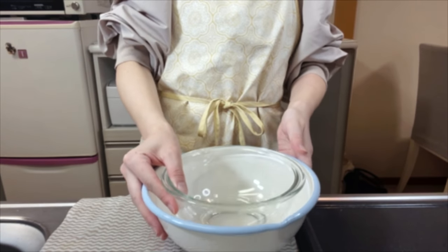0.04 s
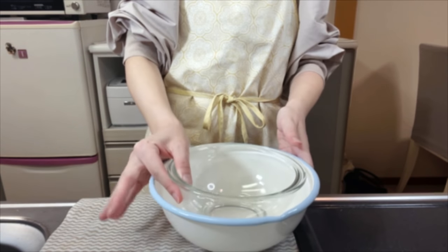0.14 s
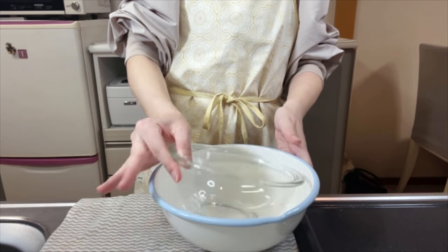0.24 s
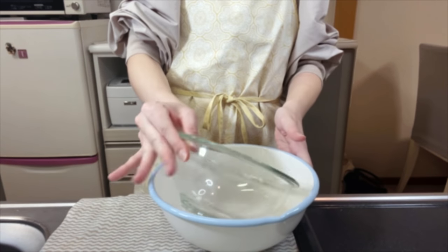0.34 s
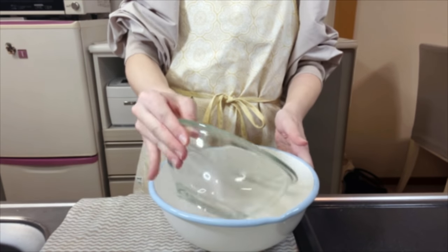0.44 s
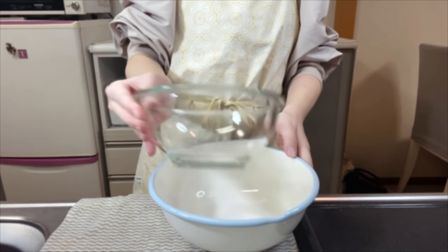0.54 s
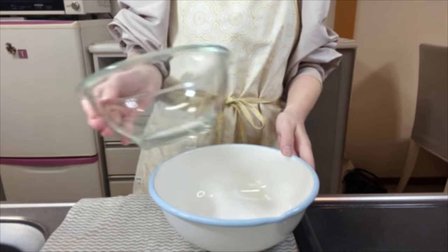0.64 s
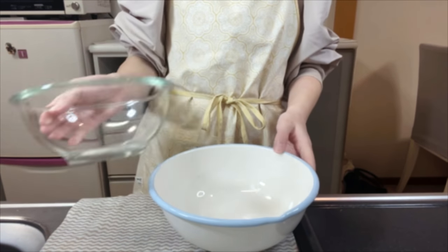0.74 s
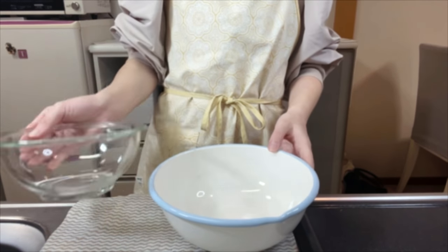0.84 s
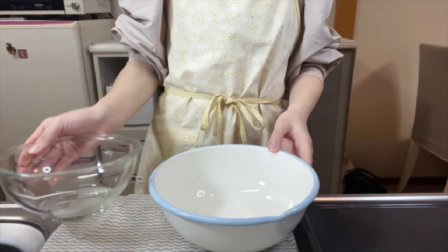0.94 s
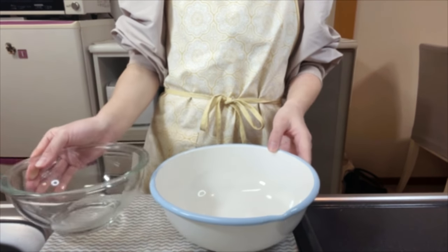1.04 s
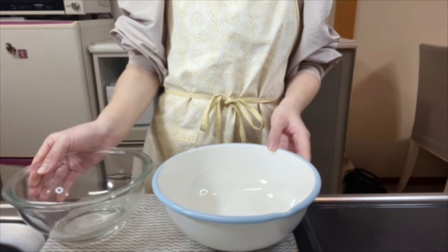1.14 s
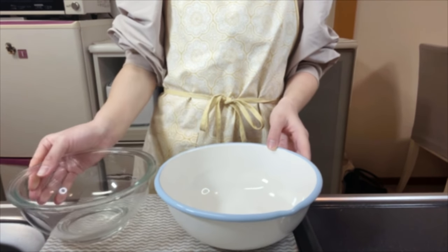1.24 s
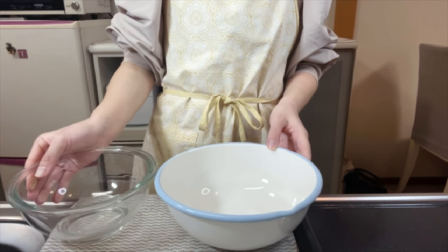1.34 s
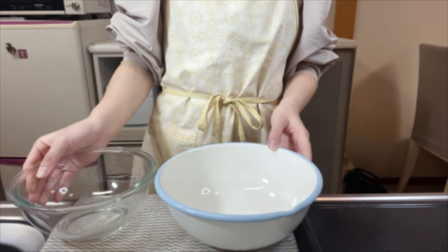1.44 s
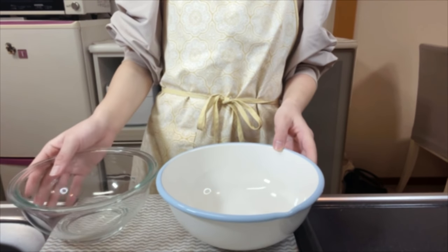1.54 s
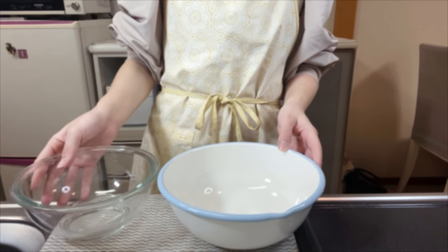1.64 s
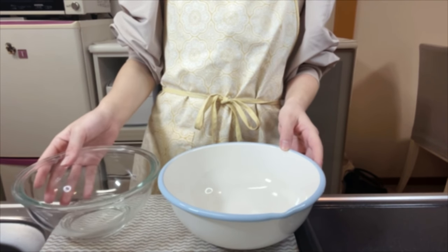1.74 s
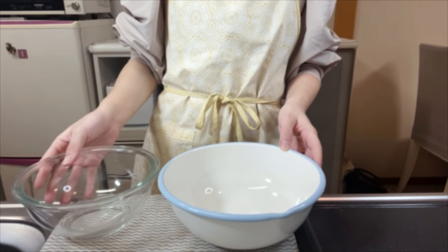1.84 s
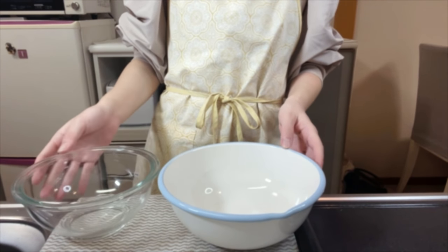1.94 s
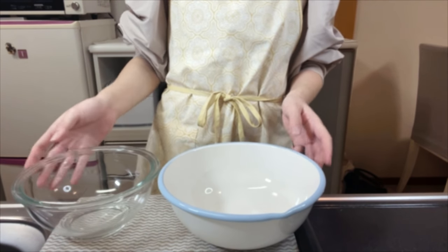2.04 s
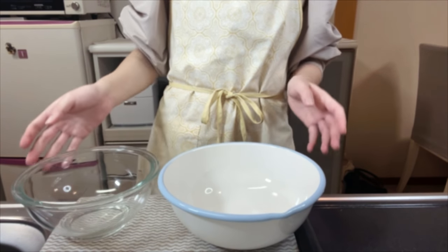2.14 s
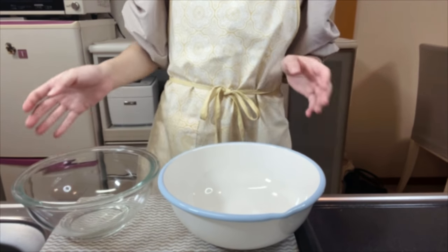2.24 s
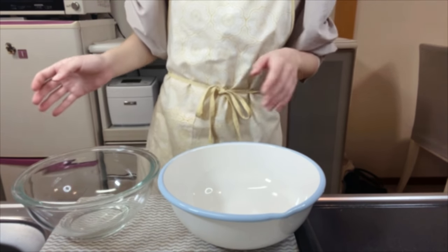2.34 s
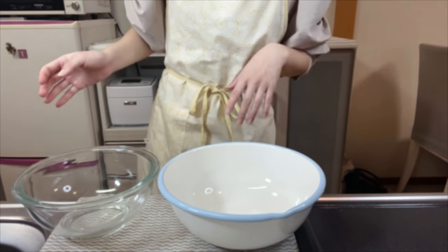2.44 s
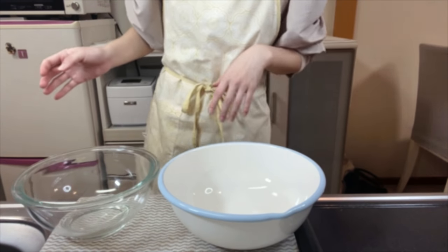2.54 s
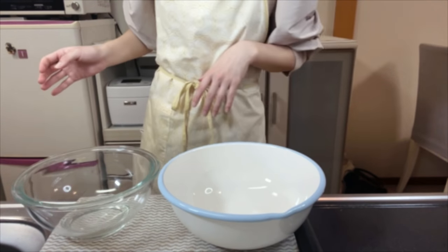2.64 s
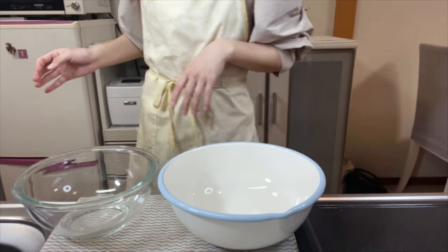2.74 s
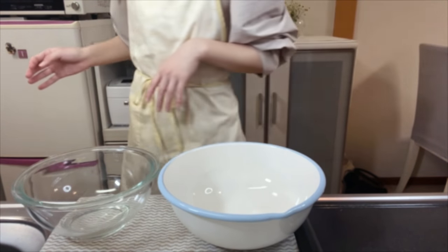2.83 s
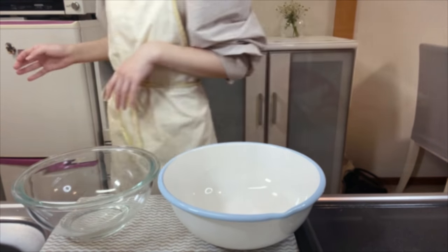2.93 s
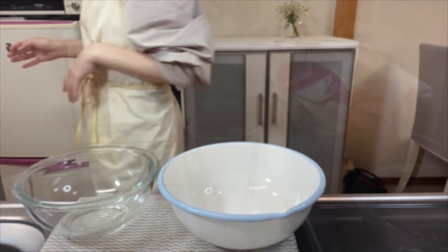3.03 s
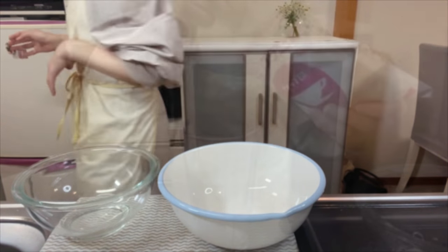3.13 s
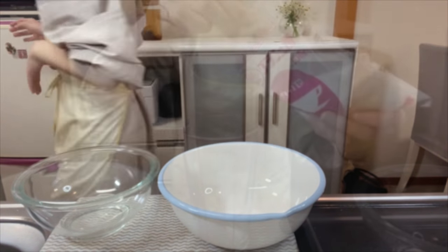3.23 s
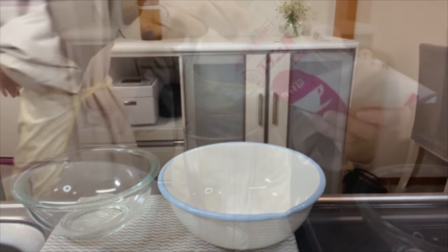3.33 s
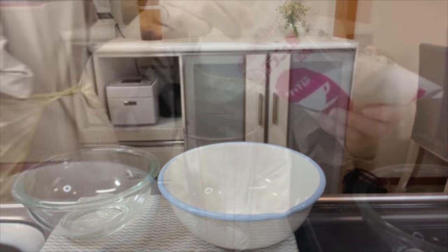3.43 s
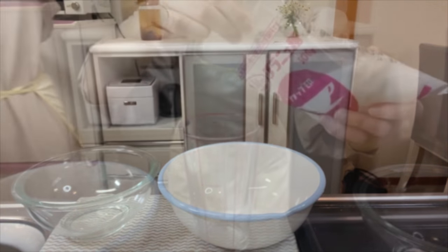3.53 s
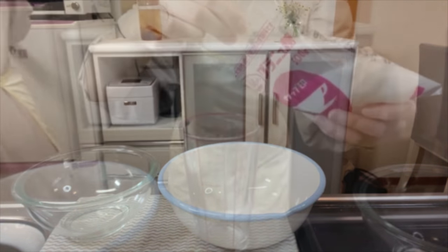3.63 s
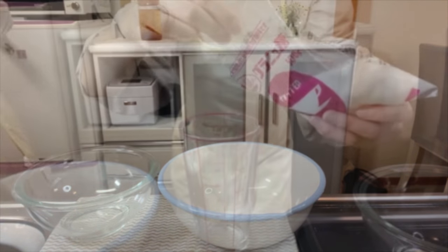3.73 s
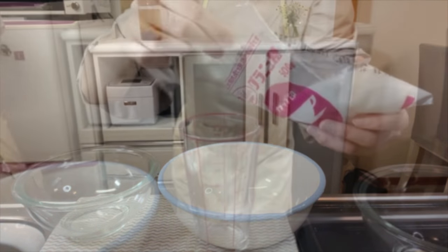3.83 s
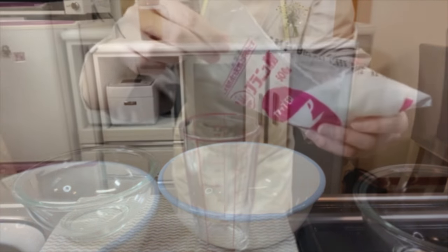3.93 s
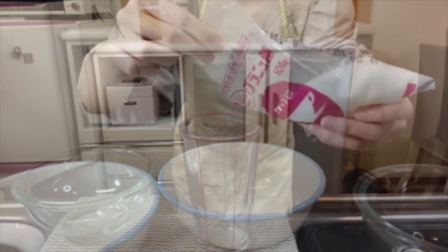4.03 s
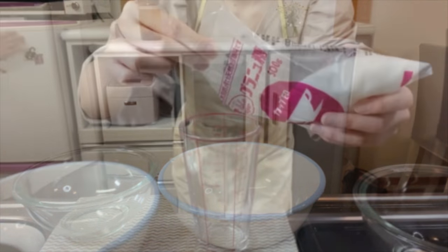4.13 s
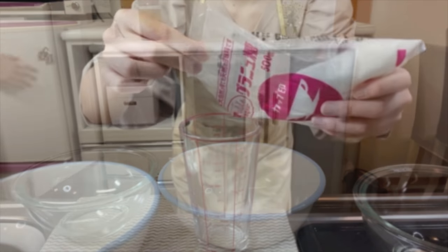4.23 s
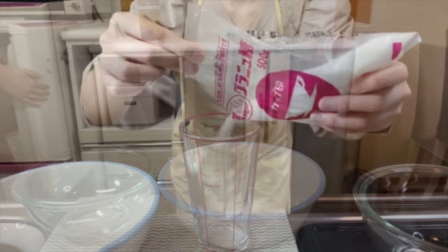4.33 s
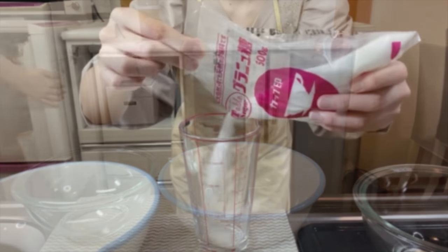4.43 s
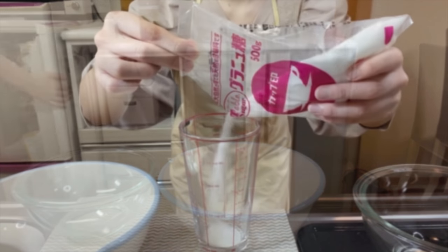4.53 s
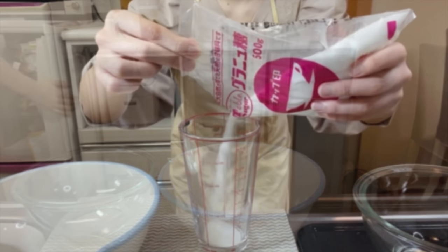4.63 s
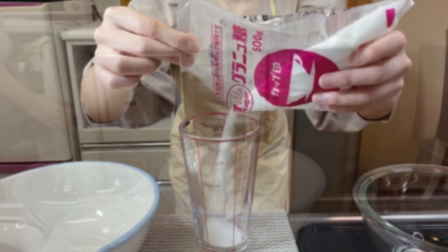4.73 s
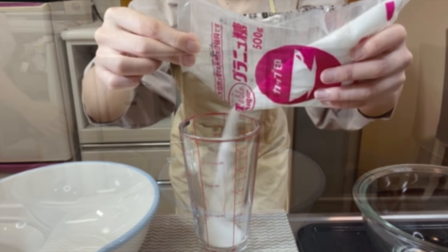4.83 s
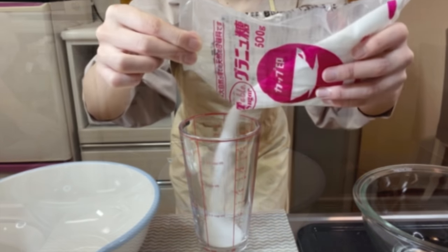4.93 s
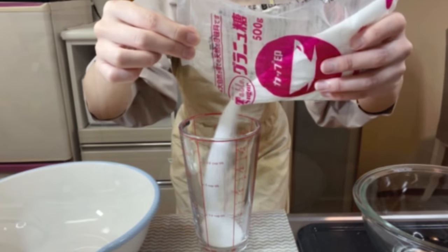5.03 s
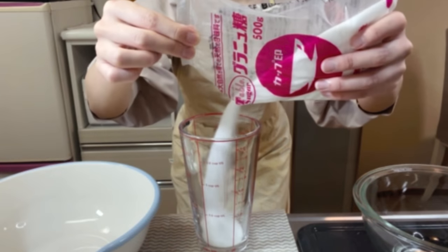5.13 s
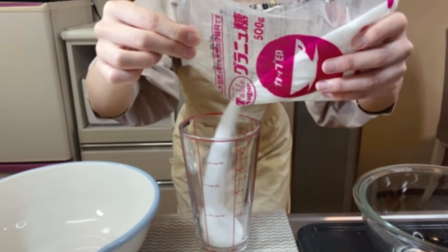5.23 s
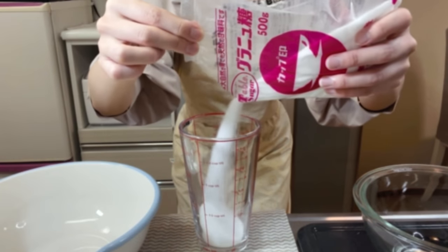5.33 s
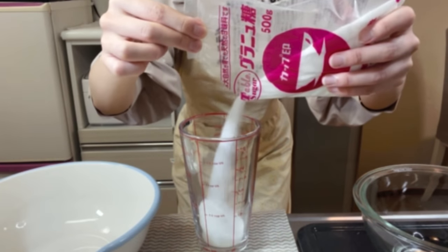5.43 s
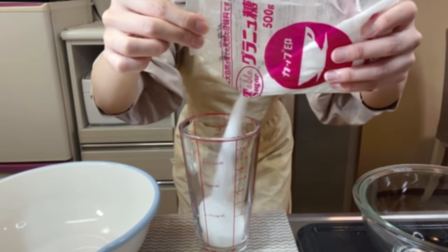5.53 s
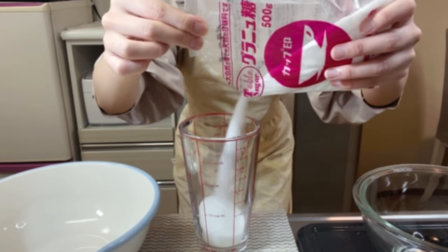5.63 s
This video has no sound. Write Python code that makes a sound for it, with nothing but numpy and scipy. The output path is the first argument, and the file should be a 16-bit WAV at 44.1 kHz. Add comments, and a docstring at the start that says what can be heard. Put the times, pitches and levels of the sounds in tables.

```python
"""In a quiet kitchen, a glass bowl scrapes out of an enamel bowl and is set down against a dish. Rubbing makes
the bowls hiss and squeal; knocks make the glass bowl ring in three clinks, its notes short and raised where it
presses on the dish. Someone steps away, clothes rustling. The room's hum swells as the scene fades over to
sugar pouring from a crackling bag, its crystals ticking on a tall glass. A microphone listens close by, left
and right."""
import sys
import numpy as np
from scipy import signal
from scipy.fft import rfft, irfft, next_fast_len
from scipy.io import wavfile
from scipy.ndimage import uniform_filter1d

SR = 44100
rng = np.random.default_rng(int(sys.argv[2]) if len(sys.argv) > 2 else 0)


def unload_audio(sound):
    """Save the sound as a 16-bit wav file, at the path given as the first command line argument."""
    columns = np.transpose(np.atleast_2d(sound))
    # keep every value between -1 and 1, then stretch to whole-number steps
    steps = np.round(np.clip(columns, -1, 1) * 32767)
    wavfile.write(sys.argv[1], SR, steps.astype(np.int16))


N = 250047
LIFT_S, SET_DOWN_S = .32, 1.1  # the glass bowl is in the air between these times

# The notes things ring with. Each row: pitch in Hz, level in dB, ring time in seconds
# (the time to fade by 60 dB, or t60), phase of right against left in radians.
GLASS_NOTES = [(409, -14, 1.1, 0), (1139, -24, 2, -2), (2144, 0, 1, 2.7), (2964, -10, .5, 1.6),
               (3007, -9, .55, 0), (3683, -3, .55, 2.6), (4242, 0, .36, -1.7), (4278, -2, .27, .8),
               (4805, -8, .3, -.8), (4857, -10, .3, .7), (5380, -14, .3, -2.5), (5456, -4, .31, 1.1),
               (6066, -6, .22, 1.6), (6270, -21, .5, -1.5), (6297, -16, .5, -2.4), (6655, -10, .22, -1.4),
               (7220, -12, .16, .3)]
RIM_NOTE = [(2079, 0, 1, 0)]  # the bowl's clearest note, strong or weak by the spot that is struck
PRESSED_NOTES = [(863, -15, .12, -.5), (1167, -7, .12, -.6), (2178, -2, .16, .9), (3025, -6, .11, .4),
                 (3055, -7, .15, .8), (3095, -11, .1, 0), (4307, -11, .1, 0), (3720, -4, .17, 2.4),
                 (4880, -10, .16, 0), (5449, -14, .15, 2), (6686, -14, .16, -1), (7262, -18, .13, -.5),
                 (7600, -22, .14, 0), (8258, -18, .12, -1.6), (8432, -20, .11, -2), (8790, -20, .1, -2),
                 (9200, -23, .1, 0), (10450, -23, .1, 0)]
TOUCH_NOTES = [(704.4, -1.5, 0.094, 3.5), (1222, -14.5, .08, 2), (1353.5, -5.5, 0.12, -1),
               (1379, 3.5, 0.043, -1.8), (1506, -3, 0.072, -9), (1635, -5.5, 0.079, 0.5),
               (1873, -14.5, 0.24, 2.5), (2278, 0, 0.049, 2.5), (2620, -19.5, 0.035, 4),
               (3380, -13, 0.1, -4.5)]  # both bowls, muffled where they touch
ENAMEL_NOTES = [(1194.6, -58, 4.5, -.2), (1196.2, -66, 4.5, -.2), (1117, -68, 1.5, -2)]  # two lie so close that they slowly waver
# The tone of the clatter. Each row: frequency in Hz, level in dB.
CLATTER_TONE = [(120, -42.5), (200, -1), (1000, -21.5), (1160, 0), (1940, -0.5), (2130, -36.5), (2650, -4),
                (3020, -13.5), (12600, -12.5), (16000, -45)]
# The knocks. Each row: start in seconds, five levels in dB (glass, rim, pressed, touch, clatter), # rattle time
# in seconds, brightness of the pressed notes in dB per octave.
KNOCKS = [(0.053, -65, -84, -63, -41, -54.5, 0.0043, 1), (0.093, -69, -71, -63, -42.5, -57, 0.0055, -11),
          (.12, -58.5, -63.5, -48, -65, -64, .007, -1), (.266, -57, -47, -72, -34, -60, 0.0068, 2),
          (0.282, -51, -59.5, -68, -26, -63, 0.0012, 0), (.314, -65, -63, -77, -24, -64, 0.0026, 0),
          (.324, -42.5, -32.5, -63, -44, -25, 0.0058, 0), (1.251, -36, -39.5, -29.5, -46, -22, 0.02, 0),
          (1.257, -28, -24, -22, -24, -17.5, 0.016, -7), (1.418, -43, -38, -26, -32, -17, 0.0064, 2),
          (1.436, -39, -47.5, -33.5, -23.5, -30, 0.021, 0.5),
          (1.677, -37.5, -41.5, -39, -26.5, -25, 0.013, 3), (1.684, -25, -40, -21.5, -32, -25.5, 0.024, 1)]
def bowl_knocks():
    """Each knock is one hit and a dying rattle of smaller ones; returns ringing and clatter."""
    ringing, clatter = np.zeros((2, 2, N))
    held, free = [(ring(GLASS_NOTES, .9, grip, tilt_db=-3.5), ring(RIM_NOTE, .9, grip))
                  for grip in (2.8, 0)]
    touch, t = ring(TOUCH_NOTES, .4), np.arange(4000) / SR
    for start, glass_db, rim_db, pressed_db, touch_db, clatter_db, rattle_s, bright_db in KNOCKS:
        dying = np.exp(-t / rattle_s)
        rattle = dying * rng.standard_normal(len(t)) * (rng.random(len(t)) < .04)
        hits = (t == 0) + .99 * rattle / np.linalg.norm(rattle)
        glass, rim = free if LIFT_S < start < SET_DOWN_S else held
        pressed = ring(PRESSED_NOTES, .4, tilt_db=bright_db)
        notes = gain_of(glass_db) * glass + gain_of(rim_db) * rim
        add(notes, 0, gain_of(pressed_db) * pressed + gain_of(touch_db) * touch)
        struck = signal.fftconvolve(notes, hits[None], axes=1)
        swell = rise(np.arange(struck.shape[1]) / SR, .0026)
        add(ringing, start, swell * struck)
        noise = coloured(stereo_noise(len(t), shared=.27), CLATTER_TONE)
        add(clatter, start, gain_of(clatter_db) * swell[:len(t)] * dying * noise)
    add(ringing, 1.69, gain_of(-1) * ring(ENAMEL_NOTES, 2))  # enamel sings on after the last clink
    return ringing, clatter


# The strength of the sugar stream. Each row: time in seconds, level in dB.
SUGAR_FLOW = [(3.75, -71.5), (4.022, -57), (4.208, -30), (4.33, -31.5), (4.476, -45), (4.664, -43),
              (4.926, -34.5), (5.226, -35.5), (5.562, -41.5), (5.67, -40.5)]
# The tone of the ticking crystals. Each row: frequency in Hz, level in dB.
SUGAR_TONE = [(180, -56), (300, -5), (405, -11.5), (915, -14), (3030, -8.5), (3400, -5.5), (3890, -13),
              (4230, -8.5), (6960, -7), (9880, -10.5), (12100, -7.5), (15200, -15), (16000, -33)]
# The tall glass's notes. Each row: pitch in Hz, width in Hz (wider dies sooner), level in dB.
TALL_GLASS_NOTES = [(3227, 260, -20), (4563, 530, 9), (6540, 160, -27), (6894, 200, 3)]
def sugar_pour():
    """Thousands of crystals tick on the glass and make its wall ring."""
    ticks = grains(per_s=14000, spread_db=2.8, shared=.35)
    ticks[0] = np.roll(ticks[0], 6)  # the glass stands nearer the right, so the left hears it later
    wall = ring([(hz, db, 4.3 / width, 0) for hz, width, db in TALL_GLASS_NOTES], .05)
    ringing = evened(signal.fftconvolve(ticks, wall, axes=1)[:, :N])
    ringing *= gain_of(np.where(clock() <= 4.04, -4.5, -18.5))  # drops as sugar covers the glass
    flutter = gain_of(1.3 * evened(uniform_filter1d(rng.standard_normal(N), 1500)))  # an uneven stream
    # each snap of the bag shakes extra sugar out
    jolts = 1 + sum(gain_of(-1.5) * pulse(start, rise_s=.001, t60=.0896) for start, _ in BAG_SNAPS)
    return follow(SUGAR_FLOW) * jolts * flutter * (coloured(ticks, SUGAR_TONE) + ringing)


# The bag's snaps. Each row: start in seconds, level in dB.
BAG_SNAPS = [(4.259, -11), (4.353, -10)]
# The notes of a snap. Each row: pitch in Hz, level in dB, ring time in seconds, phase in radians.
SNAP_NOTES = [(700, -57, 0.025, .3), (1496, 9.5, 0.0031, 1), (2840, 5, 0.0043, 2.12),
              (4440, -8, 0.011, 2.1), (6500, -21, .005, 4.5)]
def bag_snaps():
    """A crease of the bag lets go all at once."""
    out, crack = np.zeros((2, N)), ring(SNAP_NOTES, .05)
    crack *= rise(np.arange(crack.shape[1]) / SR, .00028)
    for start, db in BAG_SNAPS:
        add(out, start, gain_of(db) * crack)
    return out


# Glass dragging on enamel. Each row: time in seconds, level of the hiss in dB.
SCRAPE_LEVELS = [(.11, -72), (.122, -45), (.15, -56.5), (.19, -47), (.27, -41), (.345, -35.5), (.38, -58),
                 (.43, -63)]
# The tone of that hiss. Each row: frequency in Hz, level in dB.
SCRAPE_TONE = [(400, 7.5), (900, -5.5), (3300, -1), (4500, -13.5), (7000, -8.5), (10000, -17),
               (12500, -14.5), (16000, -25)]
def bowl_scrape():
    """Tiny slips hiss and set the touching bowls ringing; the rim catches and squeals until the lift."""
    slips, hiss = grains(per_s=5000, spread_db=.66, shared=.4), follow(SCRAPE_LEVELS)
    touching = clock() < LIFT_S
    bite = gain_of(-45) * (hiss / gain_of(-43)) ** 1.8 * touching  # a harder drag rings much more
    notes = ring(TOUCH_NOTES, .2) + gain_of(-19) * ring(PRESSED_NOTES, .2, tilt_db=1.7)
    bowls = resonate(bite * evened(slips), notes)
    catch = gain_of(-34.5) * np.clip((clock() - .22) / .027, 0, 1) * touching
    squeal_note = ring([(1404, 0, .097, .66)], .2)
    squeal = resonate(catch * evened(slips.sum(0))[None], squeal_note)
    return hiss * coloured(slips, SCRAPE_TONE) + bowls + squeal


# Soft bumps of counter, bowls and floor. Each row: start in seconds, level in dB, pitch in Hz.
THUMPS = [(.189, -31.5, 344), (.192, -27, 737), (0.336, -31.5, 151), (1.143, -15.5, 88.9),
          (1.145, -30.5, 197.4), (1.265, -25, 157), (1.419, -22, 89.7), (1.577, -37.5, 83),
          (1.681, -30.5, 94.5), (2.35, -40.5, 116), (2.938, -42, 97.6), (3.348, -31.5, 100.6),
          (3.362, -28.5, 65), (3.41, -41.5, 492), (3.452, -36, 201), (3.531, -34.5, 202),
          (3.691, -38.5, 183), (3.505, -35.5, 90.7), (3.512, -30.5, 269), (3.667, -34.5, 291),
          (3.673, -34, 83), (3.749, -39, 314), (3.839, -31.5, 95.8), (3.873, -47, 960), (4.022, -38.5, 803),
          (4.024, -41, 700), (4.046, -32, 95), (5.089, -29, 111), (5.515, -28, 107)]
def thumps():
    """A bumped thing swings briefly and chatters with small contacts; higher pitches die sooner."""
    out, t = np.zeros(N), np.arange(SR // 2) / SR
    for start, db, hz in THUMPS:
        t60 = .19 / (hz / 100) ** .15
        swing = gain_of(db - 60 * t / t60) * rise(t, .0058) * np.sin(2 * np.pi * hz * t)
        chatter = rng.standard_normal(len(t)) * np.exp(-t / .019)
        bump = swing + .8 * signal.fftconvolve(swing, chatter / np.linalg.norm(chatter))[:len(t)]
        add(out, start, bump * np.linalg.norm(swing) / np.linalg.norm(bump))
    return out


# Dull scuffs of steps or a door. Each row: start in seconds, level in dB, fade time in seconds,
# treble in dB.
SCUFFS = [(2.353, -52, .22, -19), (2.791, -59, .093, -24), (2.884, -55.5, 0.142, -25.5),
          (2.933, -57, 0.6, -17), (3.345, -48.5, 0.21, -17.5), (3.403, -51.5, .22, 0),
          (3.504, -40, 0.19, -25), (3.661, -40, .23, -41), (3.742, -45.5, 0.063, -34),
          (3.873, -48, 0.094, -44)]
def scuffs():
    """Each scuff is a tick at the first touch, then a soft puff of noise."""
    out, t = np.zeros((2, N)), np.arange(SR // 2) / SR
    for start, db, t60, treble_db in SCUFFS:
        treble = [(8000, treble_db), (12500, treble_db - 4.5), (16000, treble_db - 8)]
        puff = coloured(stereo_noise(len(t), shared=.68), [(60, -20), (250, 0), (1140, -6)] + treble)
        tick = gain_of(-3) * np.exp(-t / .0027)
        add(out, start, gain_of(db - 60 * t / t60) * (rise(t, .0063) + tick) * puff)
    return out


# Sleeves, apron and bag moving. Each row: start in seconds, length in seconds, top level in dB.
MOVEMENTS = [(0.417, 0.47, -64), (1.035, 0.26, -76), (1.98, 0.47, -62.5), (2.324, 0.12, -63),
             (2.525, .19, -71.5), (2.767, 0.49, -69), (3.1, 0.42, -67), (3.325, 0.25, -63.5),
             (3.489, 0.089, -51), (3.637, 0.093, -54), (3.79, 0.19, -80)]
# The tone of the rustle. Each row: frequency in Hz, level in dB.
RUSTLE_TONE = [(180, -70), (300, 3), (528, -14), (774, -23), (1320, -4.5), (3190, -7), (9880, -25.5),
               (12700, -23.5), (16000, -36)]
def cloth_rustle():
    """Cloth crackles softly, one swell for each movement."""
    level = np.zeros(N)
    for start, length, db in MOVEMENTS:
        progress = np.arange(0, length, 1 / SR) / length
        swell = abs(np.sin(np.pi * progress ** .84)) ** 1.8  # a narrow hump that peaks early
        add(level, start, gain_of(db) * swell)
    return level * coloured(grains(per_s=9000, spread_db=1.8, shared=.1), RUSTLE_TONE)


# The tone of the kitchen's hum. Each row: frequency in Hz, level in dB.
HUM_TONE = [(15, -33), (30, -38.5), (55, -12.5), (90, -0.5), (112, -3), (140, -11.5), (170, -10),
            (220, -15.5), (400, -13), (600, -19.5), (1000, -26), (1500, -33), (6000, -45.5), (12200, -51),
            (16000, -61)]
# How alike it is left and right. Each row: frequency in Hz, likeness from 0 to 1.
HUM_LIKENESS = [(30, .92), (110, 0.66), (300, 0.74), (700, .2), (2000, .1)]
def room_hum():
    """Low noise drifts in patches, grows for the pouring scene and jumps as knocks shake the counter."""
    frames, hz = N // 256 + 5, np.fft.rfftfreq(1024, 1 / SR)
    left_re, left_im, own_re, own_im, patches = rng.standard_normal((frames, 513, 5)).T
    patches = evened(uniform_filter1d(uniform_filter1d(patches, 6, 0), 10, 1))
    alike, left = read(HUM_LIKENESS, hz)[:, None], left_re + 1j * left_im
    right = alike * left + np.sqrt(1 - alike ** 2) * (own_re + 1j * own_im)
    spectra = np.array([left, right]) * gain_of(read(HUM_TONE, hz)[:, None] + 2 * patches)
    level = np.interp(clock(), [3.26, 4.48], gain_of([-57.5, -42.5]))
    for start, *_, clatter_db, _, _ in KNOCKS:
        level += gain_of(clatter_db - 19.5) * pulse(start, rise_s=.02, t60=.44)
    return level * evened(signal.istft(spectra, nperseg=1024, noverlap=768)[1][:, :N])


# How long the kitchen echoes. Each row: frequency in Hz, fade time in seconds.
ECHO_TIMES = [(100, .3), (1000, .2), (4000, .16), (12000, .13)]
def kitchen_echo(sound):
    """Many small reflections arrive at random; the high frequencies die first."""
    taps, slots = np.zeros((2, SR // 2)), np.arange(150, SR // 2 - 20, 20)
    arrivals = slots + rng.integers(0, 20, (2, len(slots)))
    np.put_along_axis(taps, arrivals, rng.choice([-1., 1.], arrivals.shape), 1)
    hz, t, spectra = signal.stft(taps, SR, nperseg=256)
    spectra *= gain_of(-60 * t / read(ECHO_TIMES, hz)[:, None])
    return resonate(sound.mean(0)[None], signal.istft(spectra, SR, nperseg=256)[1])


def ring(notes, seconds, grip=0, tilt_db=0):
    """Fading sine waves, left and right; grip muffles low notes most, tilt_db is treble per octave."""
    t = np.arange(int(seconds * SR)) / SR
    hz, db, t60, apart = np.transpose(notes)[:, :, None]
    octaves = np.log2(hz / 2048)
    fading = gain_of(db + tilt_db * octaves - 60 * t * (1 / t60 + grip / 2 ** octaves))
    return np.array([(fading * np.sin(2 * np.pi * hz * t + p)).sum(0) for p in (-apart / 2, apart / 2)])


def resonate(sound, response):
    """Plays a sound through a ringing object or a room."""
    return signal.oaconvolve(sound, response / np.linalg.norm(response[0]), axes=1)[:, :N]


def grains(per_s, spread_db, shared):
    """Random clicks, a few of them large, partly shared by left and right."""
    size = gain_of(spread_db * np.minimum(rng.exponential(1, (3, N)), 5))
    common, left, right = size * rng.standard_normal((3, N)) * (rng.random((3, N)) < per_s / SR)
    return np.sqrt(shared) * common + np.sqrt(1 - shared) * np.array([left, right])


def stereo_noise(samples, shared):
    """Hiss, partly shared by left and right."""
    return rng.standard_normal((2, samples)) + shared * rng.standard_normal(samples)


def coloured(sound, tone):
    """Shapes a sound by a tone table and evens its level."""
    size = next_fast_len(sound.shape[-1])
    gains = gain_of(read(tone, np.fft.rfftfreq(size, 1 / SR)))
    return evened(irfft(rfft(sound, size) * gains, size)[..., :sound.shape[-1]])


def read(table, hz):
    """Reads between a table's rows on a log-frequency scale."""
    frequencies, values = np.transpose(table)
    return np.interp(np.log(hz + 1), np.log(frequencies + 1), values)


def follow(table):
    """Turns times and dB into a gain for every sample, silent outside the table."""
    return gain_of(np.interp(clock(), *np.transpose(table), left=-150, right=-150))


def pulse(start, rise_s, t60):
    """A soft start, then an even fade."""
    t = np.maximum(clock() - start, 0)
    return rise(t, rise_s) * gain_of(-60 * t / t60)


def rise(t, seconds):
    """Climbs from 0 towards 1."""
    return 1 - np.exp(-t / seconds)


def add(mix, start, sound):
    """Mixes a sound in at a start time in seconds."""
    part = mix[..., round(start * SR):][..., :sound.shape[-1]]
    part += sound[..., :part.shape[-1]]


def gain_of(db):
    """Decibels to amplitude."""
    return 10 ** (np.asarray(db) / 20)


def evened(sound):
    """Scales to an average (rms) level of 1."""
    return sound / np.sqrt(np.mean(sound ** 2) + 1e-20)


def clock():
    """Time of every sample in seconds."""
    return np.arange(N) / SR


def scene():
    """Mixes all the sources; only the clinks and snaps echo in the room."""
    (ringing, clatter), snaps = bowl_knocks(), bag_snaps()
    echo = kitchen_echo(gain_of(-9.5) * ringing + gain_of(-10) * clatter + gain_of(-7) * snaps)
    clinks = (ringing + clatter) * gain_of([[.6], [-.6]])  # a little louder on the left
    background = thumps() + room_hum() + cloth_rustle()
    return clinks + snaps + echo + background + bowl_scrape() + scuffs() + sugar_pour()


# How much of the treble the right copies from the left. Each row: frequency in Hz, share from 0 to 1.
TREBLE_SHARE = [(7400, 0.0067), (8600, 0.23), (9800, 1), (11200, 0.54), (12800, 1), (14200, .7),
                (15500, 0.93)]
def record(dry):
    """In the treble the right largely copies the left, a little later; the very top is cut."""
    lag_s, cutoff_hz = 156e-6, 16300
    size = next_fast_len(N + 4096)
    hz, (left, right) = np.fft.rfftfreq(size, 1 / SR), rfft(dry, size)
    share = read(TREBLE_SHARE, hz)
    right = share * left * np.exp(-2j * np.pi * hz * lag_s) + np.sqrt(1 - share ** 2) * right
    pair = irfft(np.array([left, right]), size)[:, :N]
    lowpass = signal.firwin(511, cutoff_hz, window=("kaiser", 9), fs=SR)
    return signal.oaconvolve(pair, lowpass[None], "same")


dry = scene()
out = record(dry)
unload_audio(out)
```